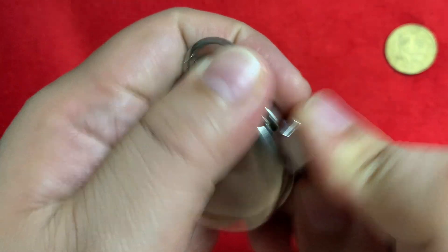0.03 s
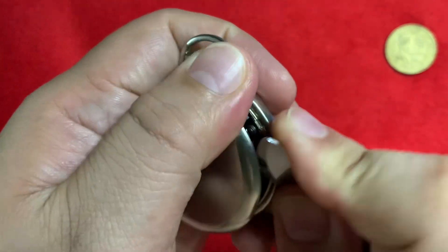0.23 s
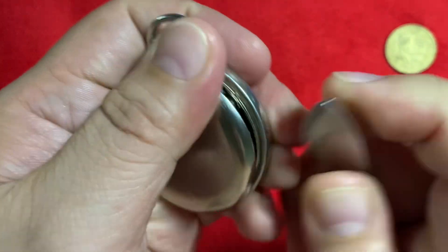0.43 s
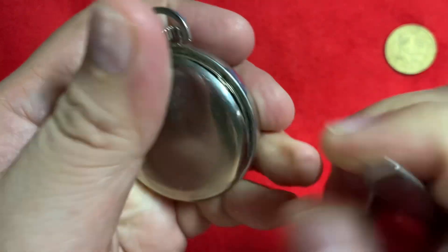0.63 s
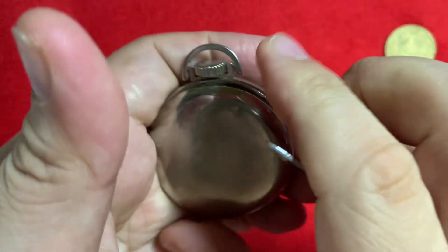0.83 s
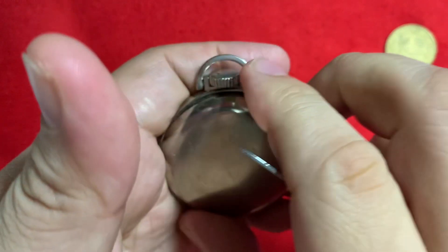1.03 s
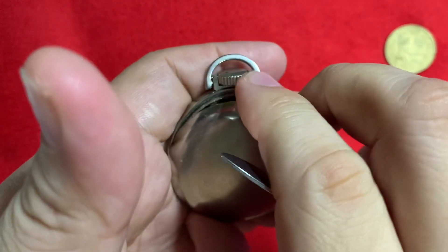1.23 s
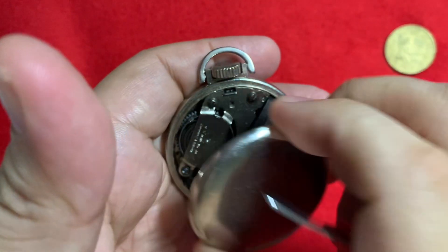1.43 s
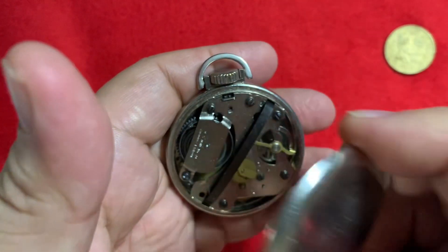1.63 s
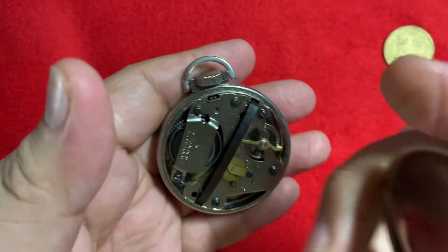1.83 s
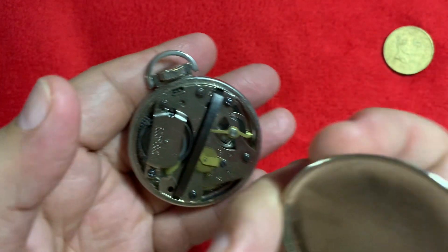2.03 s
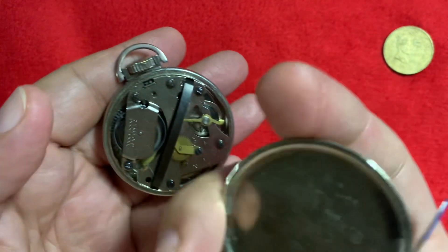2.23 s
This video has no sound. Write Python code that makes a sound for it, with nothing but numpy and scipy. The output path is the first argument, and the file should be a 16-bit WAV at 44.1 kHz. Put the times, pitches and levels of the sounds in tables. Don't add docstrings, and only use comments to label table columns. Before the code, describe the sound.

Pocket watch back pried open with one hard click, followed by lid clinks, light rubbing and faint ticks

```python
import sys
import numpy as np
from scipy import signal
from scipy.fft import rfft, irfft, next_fast_len
from scipy.io import wavfile
from scipy.ndimage import uniform_filter1d

SR = 44100
rng = np.random.default_rng(int(sys.argv[2]) if len(sys.argv) > 2 else 0)


def pcm_store(signal):
    levels = np.round(np.clip(np.atleast_2d(signal), -1, 1) * 32767)
    wavfile.write(sys.argv[1], SR, levels.astype(np.int16).T)


def linear_from_db(decibels):
    return 10 ** (np.asarray(decibels, float) / 20)


N = 101429

# start_s, level_db, brightness_db, length_s, pitch_hz
SNAP_HITS = [(.044, -42, -15.5, .008, 5600), (.0510, -43, -15, 0.00023, 1300),
             (.0535, -37.5, -14.5, 0.0055, 4400), (.0598, -50.5, 2.5, 0.0016, 5640),
             (.0619, -28.5, 16.5, 0.0013, 3700), (.0627, -14.5, -6.5, 0.0004, 1300),
             (.0643, -13.5, -11, 0.00056, 2300), (.0638, -22, -35, 0.0013, 330.6),
             (.0675, -37, -17, 0.0015, 2000), (.0705, -34, -12, .002, 1600), (.076, -29.5, -16, .004, 2200)]
# start_s, level_db, brightness_db, length_s, pitch_hz
LID_CLINKS = [(.2733, -53, 1, 0.0016, 3000), (.2895, -38, -1, 0.005, 2500),
              (.2955, -29, -7.5, 0.00067, 4550), (.2957, -46, -34, 0.00032, 2400),
              (.2975, -27.5, -12.5, 0.00056, 2300), (.3082, -40.5, -13, 0.0046, 2430),
              (.3195, -49, -15, .004, 2400), (.3739, -60, 7.5, 0.0028, 3560),
              (.4822, -44.5, -12, 0.0083, 1580), (.491, -39, -18, 0.004, 4420),
              (.498, -73, -19, 0.0034, 1500), (.5253, -44.5, -7, .002, 1510),
              (.6397, -45, -13, 0.0023, 2600), (.6645, -70, 11, 0.00068, 4200),
              (.6954, -67.5, 6, 0.0013, 3930), (.7702, -46.5, -24, 0.018, 1380),
              (.8122, -45.5, -24, 0.001, 3450), (.9146, -46.5, 2, 0.0014, 1600),
              (.9148, -47.5, -19, 0.003, 3700), (.9152, -53.5, 12, 0.0029, 8250),
              (1.0267, -52.5, 0.5, 0.019, 1740), (1.2711, -53.5, -12, 0.0018, 2960),
              (1.5562, -47, -4, 0.0041, 5450), (1.4387, -65.5, 2.5, 0.0014, 4040),
              (1.7056, -68, 2, .001, 4060), (1.9426, -75, 11, 0.0015, 3990),
              (2.2095, -72.5, 10, 0.0011, 3950)]
# pitch_hz, level_db, time_to_fade_60db_s
LID_BODY_TONES = [(300, -4, 0.024), (455, -4.5, 0.012), (800, -2, .015), (1048, 1.5, 0.0095),
                  (1605, 1.5, 0.026), (1698, -4, 0.025), (2357, 3, 0.016), (3450, -4, 0.012),
                  (3985, -5.5, 0.013), (4394, -7, 0.03), (4762, -8.5, .01)]
# pitch_hz, level_db, time_to_fade_60db_s
LID_RIM_TONES = [(5750, -8.5, 0.025), (6280, -6, 0.007), (7400, -6.5, 0.006), (8250, -20, 0.08),
                 (8870, 8.5, 0.0021), (10080, -1, .008), (9980, 0.5, 0.004), (11820, 9, 0.0037),
                 (12200, -3.5, 0.017), (13000, 8, 0.0024), (15660, -21.5, .005)]
# start_s, level_db, plate_share_db, pitch_hz
TICK_DROPS = [
    (0.5542, -47.5, -33, 8660),
    (0.8104, -55.5, -4.5, 10560),
    (1.0554, -55.5, -27, 9100),
    (1.3110, -54, 1.5, 13000),
    (1.5544, -50.5, -11.5, 9500),
    (1.8118, -56.5, 5.5, 11660),
    (2.0578, -52.5, -7.5, 9200),
]
# start_s, level_db, length_s, pitch_hz
LIGHT_CONTACTS = [(0.42, -75, 0.0012, 10000), (0.512, -53, 0.0028, 10960), (0.536, -81, .003, 9070),
                  (.770, -69, .0012, 11100), (.790, -63, .003, 9000), (.9841, -62.5, 0.0013, 10700),
                  (1.0140, -58, .002, 9500), (1.018, -61, 0.0037, 12300), (1.122, -66, .001, 12160),
                  (1.188, -73, 0.00072, 12200), (1.199, -63.5, 0.0016, 12300), (1.267, -68, .001, 11400),
                  (1.2894, -59, 0.0055, 12500), (1.39, -74, 0.0013, 11980), (1.5169, -64, .0015, 11600),
                  (1.533, -62, 0.0073, 12500), (1.5785, -58, .003, 10900), (1.7709, -63, .0012, 11800),
                  (1.7908, -54.5, 0.0092, 13700), (1.981, -66, .001, 12100), (2.0153, -62, 0.0016, 11200),
                  (2.035, -61, 0.01, 9550), (2.272, -61.5, 0.00097, 11170), (2.291, -59.5, 0.0068, 11000)]
# pitch_hz, level_db, time_to_fade_60db_s
CASE_TONES = [(5180, 4, 0.01), (6380, 8, 0.004), (7250, -30, .008), (8190, 4.5, 0.0072),
              (9500, 2.5, 0.0072), (10560, 11.5, 0.0023), (12500, 1.5, 0.023), (14000, 5, 0.008),
              (14680, -15, .004)]
# pitch_hz, level_db, time_to_fade_60db_s
PLATE_TONES = [(11430, 6.5, 0.0051), (10700, -22, 0.0057), (11630, 7, 0.018)]
# time_s, level_db
RUB_LEVEL = [
    (0, -72),
    (.44, -69.5),
    (.49, -60.5),
    (.56, -62.5),
    (.72, -88.5),
    (.79, -56.5),
    (.86, -78.5),
    (1.0, -73),
    (2.3, -96.5),
]
# pitch_hz, level_db
WALL_COLOUR = [(300, -9), (700, -2.5), (1100, 5), (2300, -0.5), (3200, -8), (6000, -3), (10000, -3.5),
               (14000, 0.5)]
# pitch_hz, level_db_per_hz
OPEN_AIR_COLOUR = [(47, -25.5), (80, -2), (151, -7.5), (278, -3), (345, -7.5), (824, -14), (1580, -21),
                   (2040, -18.5), (9000, -37), (11700, -71), (19800, -120)]
# pitch_hz, level_db_per_hz
SHUT_AIR_COLOUR = [(90, -8.5), (250, -2), (550, -12), (1300, -2), (2600, -12.5), (7000, -16), (12500, -20),
                   (14500, -25), (16000, -44.5)]
# time_s, gain_db
SUPPRESSOR_GAIN = [(0, 0), (.2, 3), (.6, 0.5), (.945, 2), (.97, -18), (1.17, -16), (1.19, 2), (1.35, 2.5),
                   (1.365, -35), (1.41, -6), (1.43, 4.5), (1.6, 1), (1.765, 3), (1.785, -17), (2.3, -36.5)]
# time_s, lower_tone_db, upper_tone_db
HUM_LEVEL = [(0.0, -58.5, -66.5), (0.43, -68, -55), (0.47, -59.5, -69.5), (0.67, -66, -57.5),
             (0.75, -56.5, -65.5), (0.88, -65.5, -72), (1.55, -61, -70), (1.66, -59, -64),
             (1.86, -65, -104.5), (1.92, -65.5, -74.5), (2.25, -60, -81), (2.3, -62.5, -73)]
# pitch_hz, correlation
MIC_LIKENESS = [(100, 0.93), (420, .97), (700, 0.12), (1000, 0.043), (5000, 0.081), (7000, 0.36),
                (10500, 0.75), (16000, .6)]


def lid(hits):
    body = strike([(s, db, length, hz) for s, db, _, length, hz in hits], LID_BODY_TONES)
    rim = strike([(s, db + bright, length, 10000) for s, db, bright, length, _ in hits], LID_RIM_TONES)
    return body + rim


def strike(hits, tones):
    rise_s = 0.0005
    hard_share = 0.75
    out = np.zeros((3, N + SR))
    t = np.arange(3000) / SR
    for start_s, level_db, length_s, centre_hz in hits:
        level = linear_from_db(level_db)
        knocks = rng.standard_normal((2, len(t)))
        luck = rng.standard_normal(len(tones))
        burst = knocks * np.exp(-t / max(length_s, 1e-4)) * np.minimum(t / rise_s, 1)
        burst = level * burst / np.sqrt(np.sum(burst ** 2, axis=1, keepdims=True))

        blow = level * np.sqrt(np.clip(hard_share * rise_s / length_s, 0, hard_share))
        burst[0] *= np.sqrt(1 - (blow / level) ** 2)
        burst[0, 8] += blow

        balanced = [(hz, db + 1.5 * u - 10 * abs(np.log2(hz / centre_hz)), t60)
                    for (hz, db, t60), u in zip(tones, luck)]
        tone = ring(burst, balanced)
        band = signal.butter(2, [centre_hz / 2.2, centre_hz + 2500], "band", fs=SR)
        crack = signal.lfilter(*band, burst)
        clap = signal.lfilter(*band, level * (t == 0))
        at = slice(int(start_s * SR), int(start_s * SR) + len(t))
        out[:2, at] += tone + linear_from_db(12) * crack
        out[2, at] += linear_from_db(-34) * tone[0] + clap
    return out[:, :N]


def ring(x, tones):
    out = 0
    for k, (hz, db, t60) in enumerate(tones):
        decay = np.exp(-np.log(1000) / (t60 * SR))
        turn = 2 * np.pi * min(hz, 0.45 * SR) / SR
        feedback = [1, -2 * decay * np.cos(turn), decay * decay]
        out = out + (-1) ** k * linear_from_db(db) * signal.lfilter([0, np.sin(turn)], feedback, x)
    return out


def escapement():
    steps = [(0, 0), (0.0013, -1.5)]
    length_s = 0.002
    drops = [(s + delay, db + gain, length_s, hz)
             for s, db, _, hz in TICK_DROPS for delay, gain in steps]
    plate_hits = [(s + delay, db + gain + plate_share, length_s, 11500)
                  for s, db, plate_share, _ in TICK_DROPS for delay, gain in steps]
    case = strike(drops + LIGHT_CONTACTS, CASE_TONES)
    return case + strike(plate_hits, PLATE_TONES)


def rub():
    centre_hz, width_hz = 1890, 3500

    def scrape(f):
        peak = 1 / np.hypot(1, (f * f - centre_hz ** 2) / (f * width_hz))
        return peak / np.hypot(1, (f / 9000) ** 2)

    grains = rng.standard_normal((2, N)) * linear_from_db(3.5 * walk(350))
    return curve(RUB_LEVEL) * unit(shaped(grains, scrape))


def room(x):
    t = np.arange(SR // 2) / SR

    def fade(x, t60):
        return unit(x * linear_from_db(-60 * t / t60) * (t > 0.0032)) / np.sqrt(len(t))

    echoes = rng.standard_normal((2, len(t)))
    low = signal.lfilter(*signal.butter(2, 3000, fs=SR), echoes)
    high = signal.lfilter(*signal.butter(3, 12500, fs=SR), echoes - low)
    tail = linear_from_db(8) * fade(low, 0.3) + linear_from_db(10) * fade(high, 0.34)
    return signal.fftconvolve(shaped(x, colour(WALL_COLOUR))[None], tail, axes=1)[:, :N]


def air():
    through = linear_from_db(-59.5) * curve(SUPPRESSOR_GAIN) * noise(OPEN_AIR_COLOUR)
    return through + linear_from_db(-68.5) * noise(SHUT_AIR_COLOUR)


def noise(points):
    out = 0
    for hz in 100 * 2. ** np.arange(8):
        def octave(f):
            return colour(points)(f) * np.cos(np.pi / 2 * np.clip(np.log2(f / hz), -1, 1))
        out = out + linear_from_db(2.2 * walk(30)) * shaped(rng.standard_normal((2, N)), octave)
    return unit(out)


def hum():
    def line(hz, width_hz):
        x = rng.standard_normal((2, N))
        return unit(shaped(x, lambda f: 1 / (1 + (2 * (f - hz) / width_hz) ** 2)))

    return curve(HUM_LEVEL) * line(63.3, 16) + curve(HUM_LEVEL, column=2) * line(116.2, 10)


def ports(pair, lag_s, loose, pan_db):
    f = np.arange(1, N // 2 + 2) * SR / N
    likeness = np.array(MIC_LIKENESS)
    alike = np.interp(np.log(f), np.log(likeness[:, 0]), likeness[:, 1])
    c = np.clip(1 - loose * (1 - alike), -0.9, 1)
    low = 1 / (1 + (f / 5200) ** 8)
    shade = linear_from_db(pan_db * low * np.clip(f / 1500, 0, 1) / 2)
    turn = np.exp(-1j * np.pi * f * lag_s * low) * shade
    shared, apart = rfft(pair) * np.sqrt([(1 + c) / 2, (1 - c) / 2])
    return np.array([irfft((shared + apart) * turn, N), irfft((shared - apart) / turn, N)])


def unit(x):
    return x / np.sqrt(np.mean(x ** 2))


def curve(table, column=1):
    table = np.array(table)
    return linear_from_db(np.interp(np.arange(N) / SR, table[:, 0], table[:, column]))


def shaped(x, gain):
    n = next_fast_len(x.shape[-1])
    f = np.arange(1, n // 2 + 2) * SR / n
    return irfft(rfft(x, n) * gain(f), n)[..., :x.shape[-1]]


def colour(points):
    p = np.array(points)
    return lambda f: linear_from_db(np.interp(np.log(f), np.log(p[:, 0]), p[:, 1]))


def walk(rate):
    k = int(SR / rate)
    fast = uniform_filter1d(uniform_filter1d(rng.standard_normal(N), k), k)
    return unit(fast - uniform_filter1d(fast, size=6 * k))


def scene():
    snap = lid(SNAP_HITS)
    near = lid(LID_CLINKS) + escapement()
    background = air() + hum()
    mix = ports(snap[:2], lag_s=0.0005, loose=1, pan_db=2)
    mix = mix + ports(near[:2] + rub(), lag_s=0.00026, loose=1, pan_db=-6)
    mix = mix + ports(room(snap[2] + near[2]), lag_s=0, loose=0.96, pan_db=4)
    return mix + ports(background, lag_s=-0.00027, loose=1, pan_db=0)


def top_cut(x):
    return signal.sosfilt(signal.butter(12, 16800, fs=SR, output="sos"), x)


def record(dry):
    rounded = np.tanh(1.151 * dry) / 0.85
    treble_cut = signal.ellip(6, 0.3, 60, 15900, fs=SR, output="sos")
    mix = signal.sosfilt(treble_cut, rounded)
    return top_cut(mix)


dry = scene()
out = record(dry)
pcm_store(out)
```